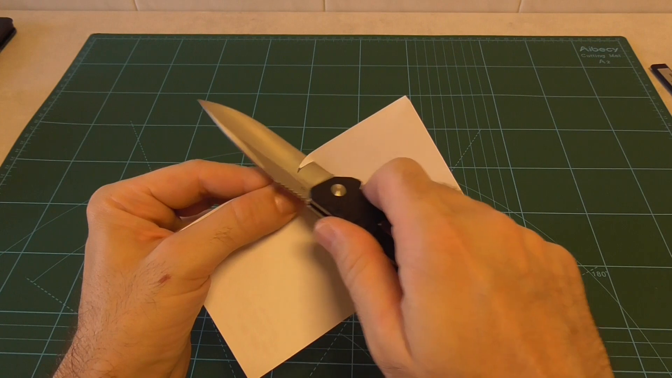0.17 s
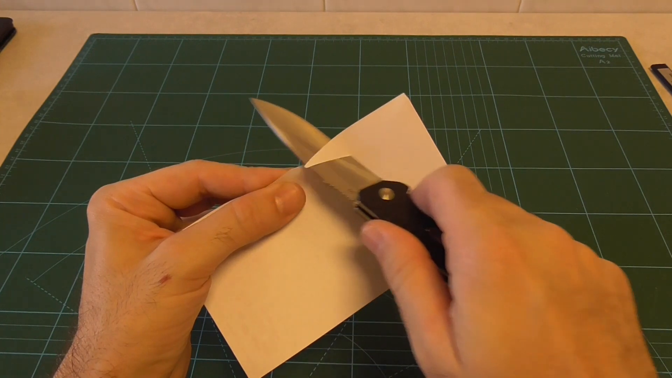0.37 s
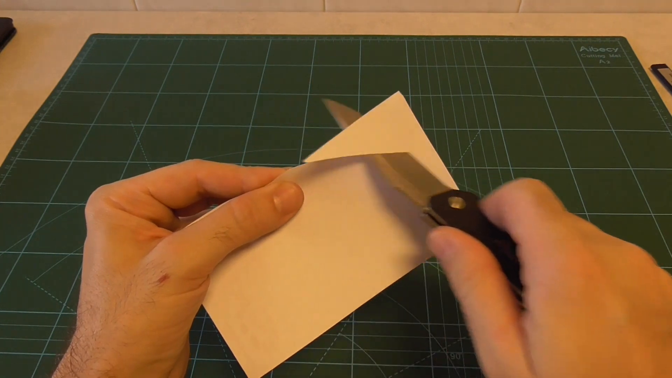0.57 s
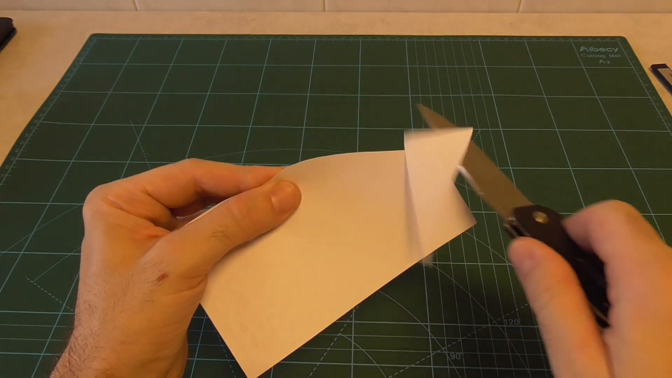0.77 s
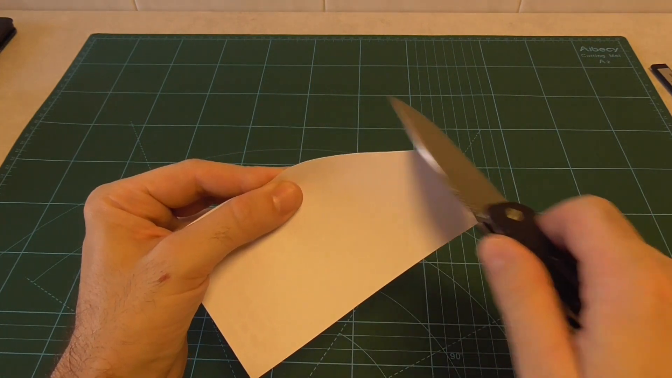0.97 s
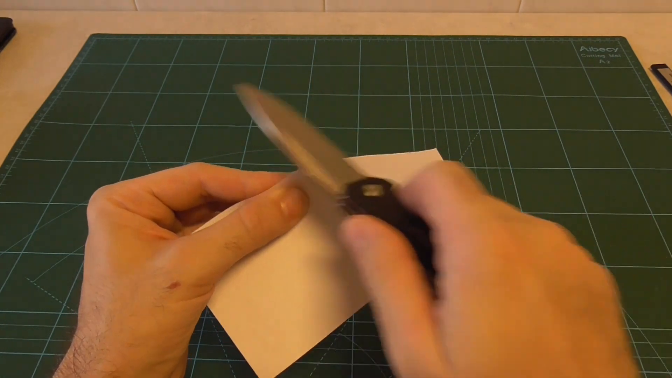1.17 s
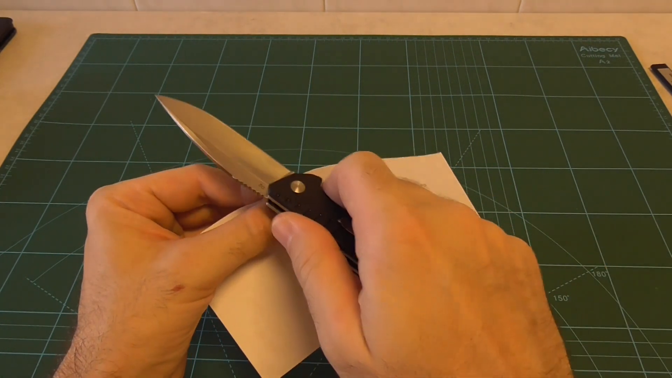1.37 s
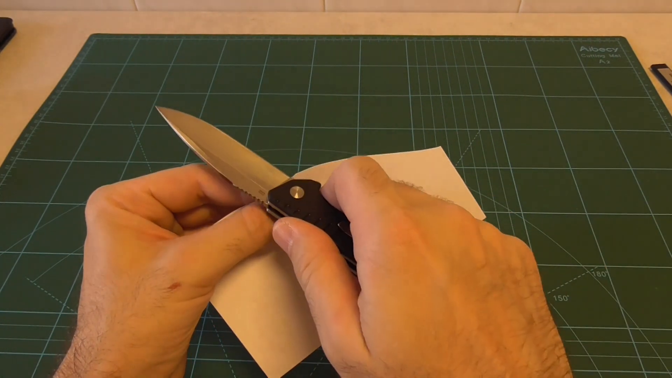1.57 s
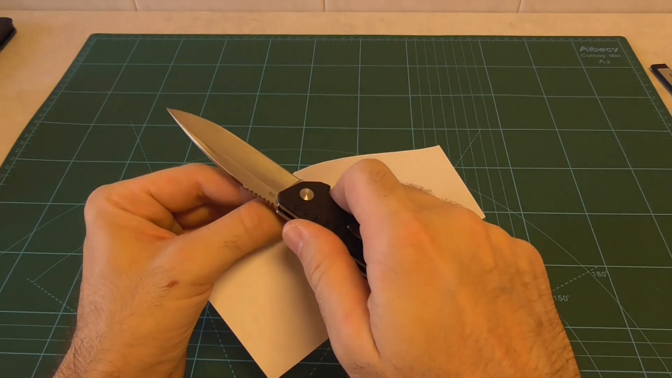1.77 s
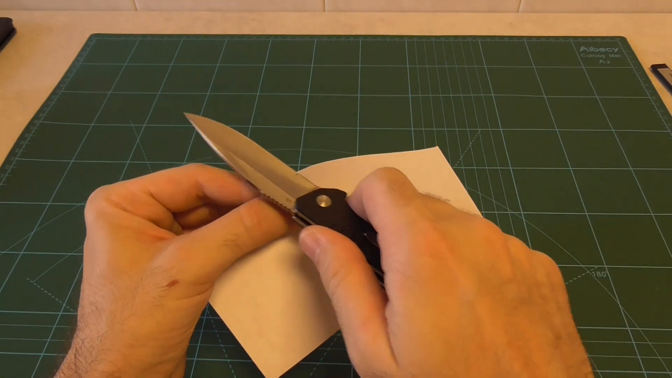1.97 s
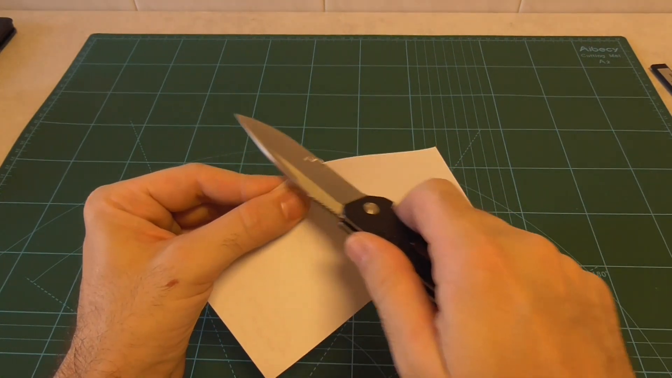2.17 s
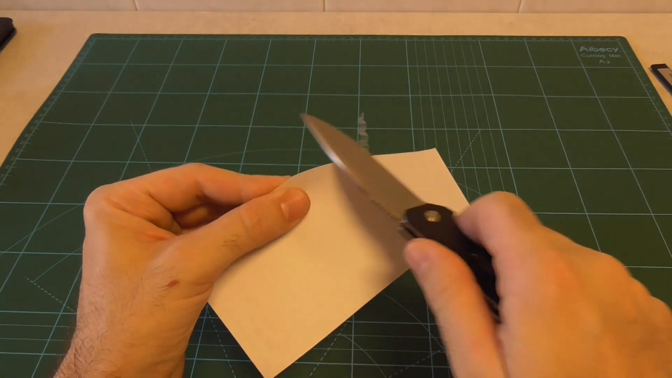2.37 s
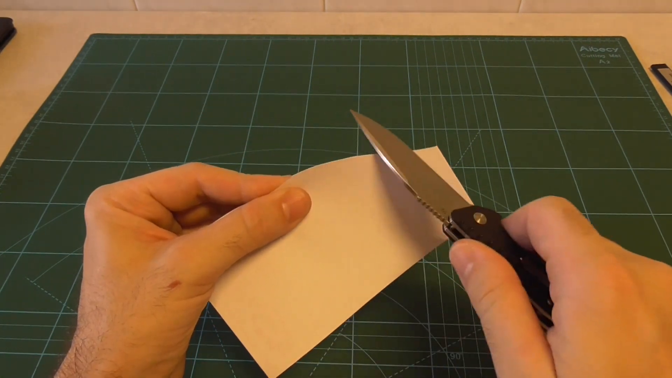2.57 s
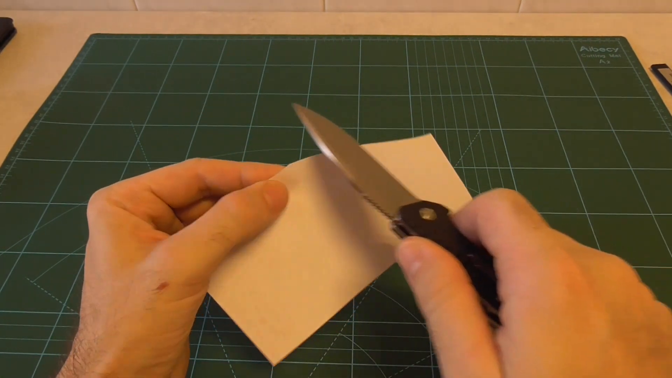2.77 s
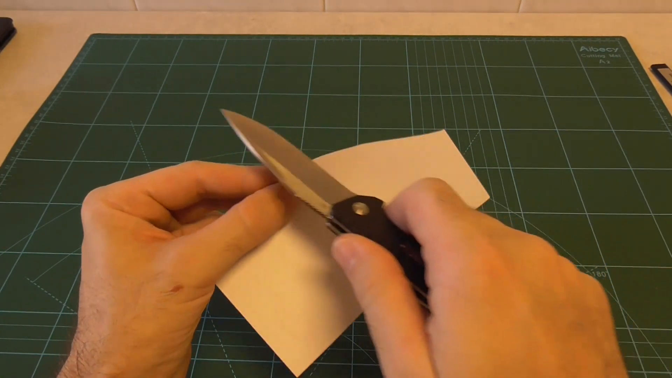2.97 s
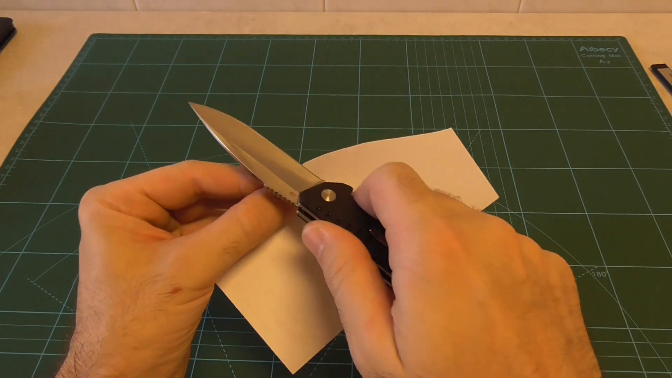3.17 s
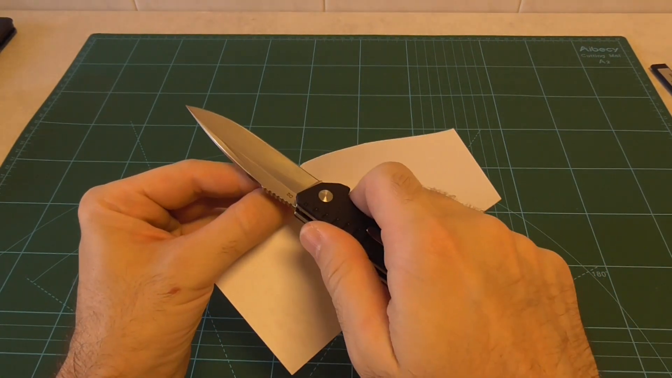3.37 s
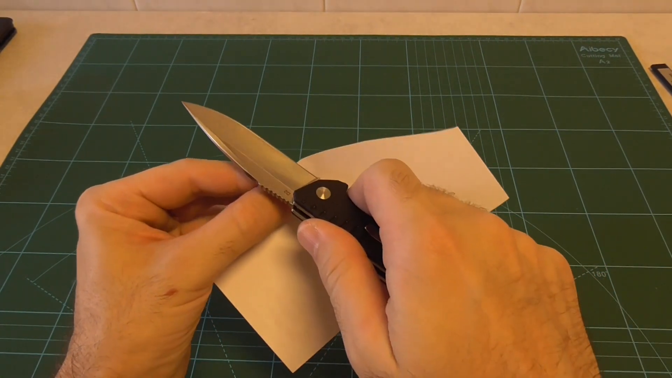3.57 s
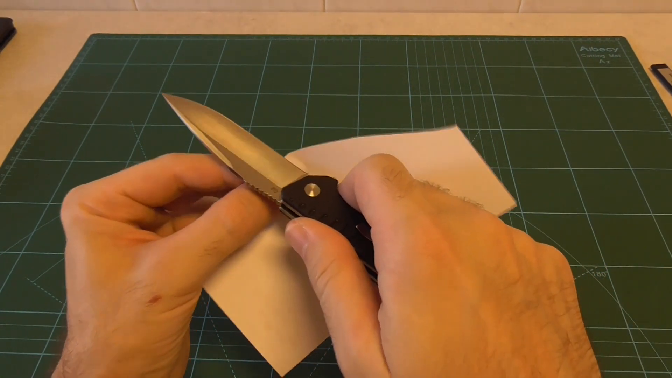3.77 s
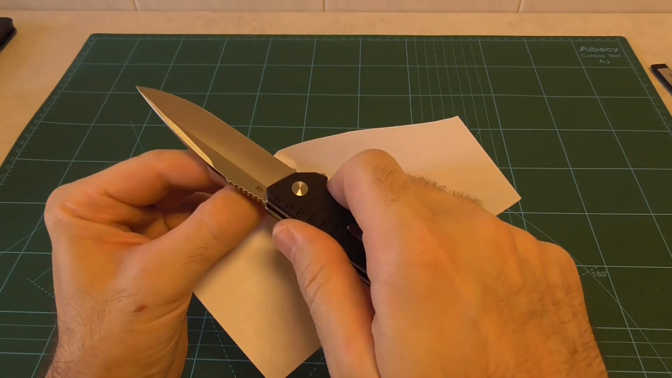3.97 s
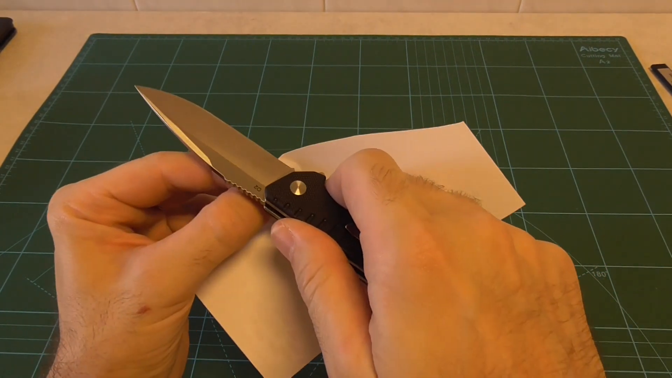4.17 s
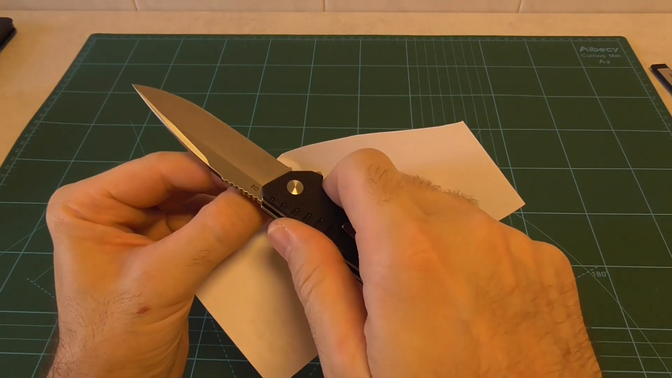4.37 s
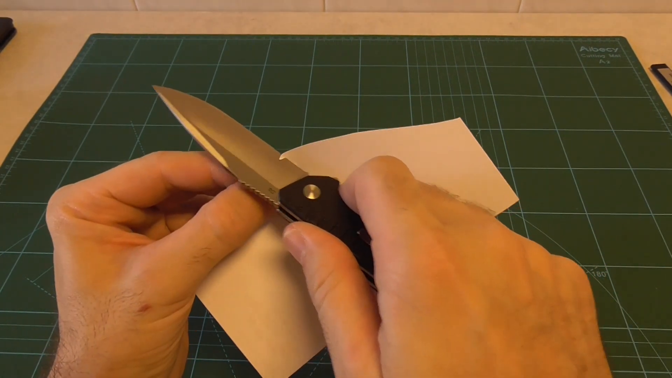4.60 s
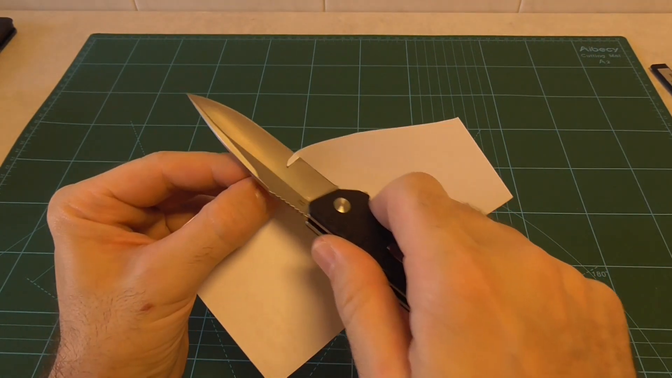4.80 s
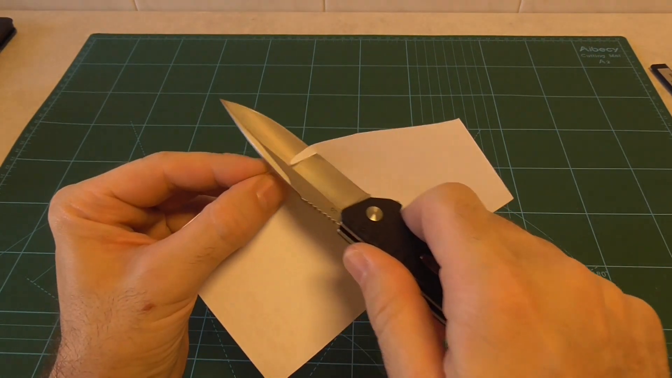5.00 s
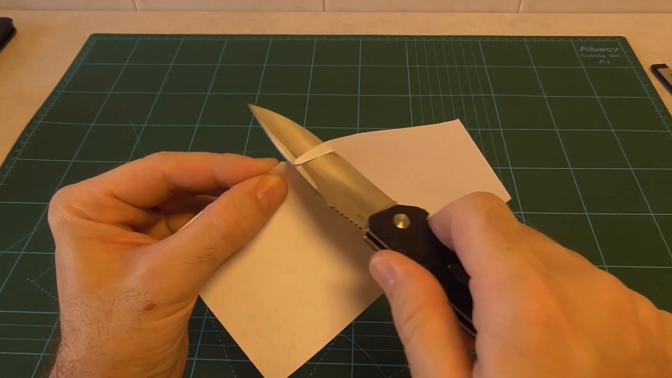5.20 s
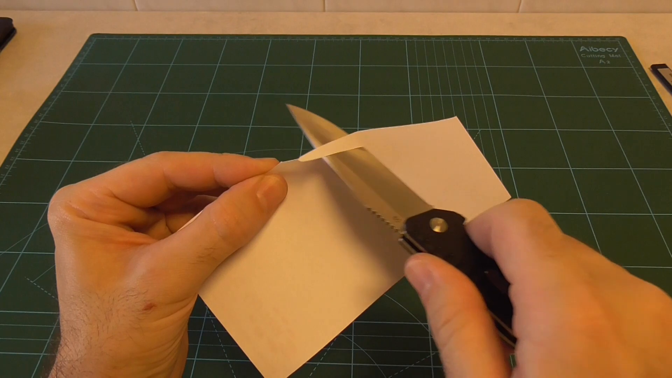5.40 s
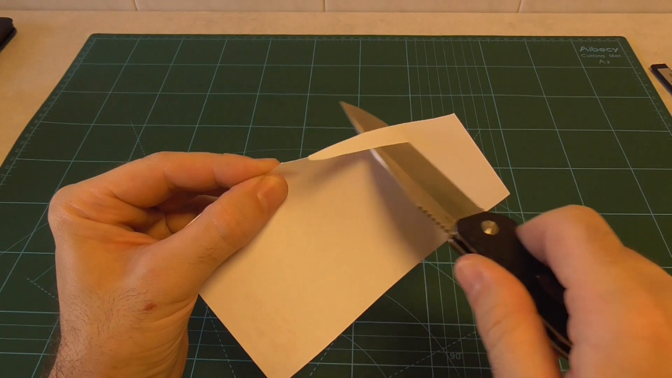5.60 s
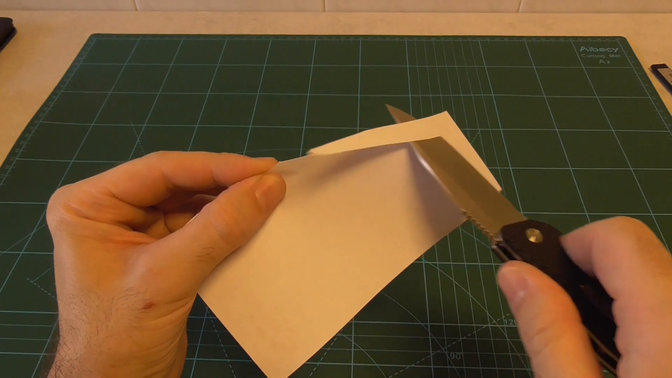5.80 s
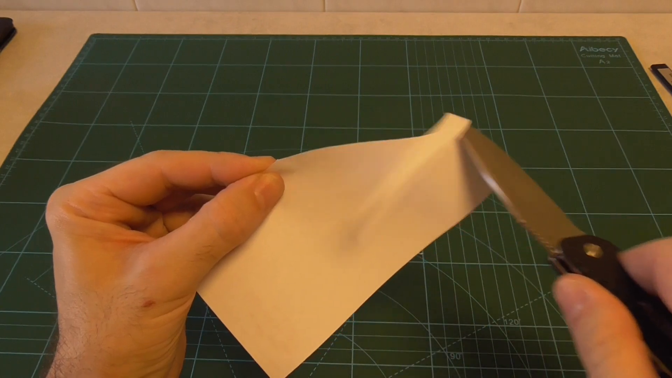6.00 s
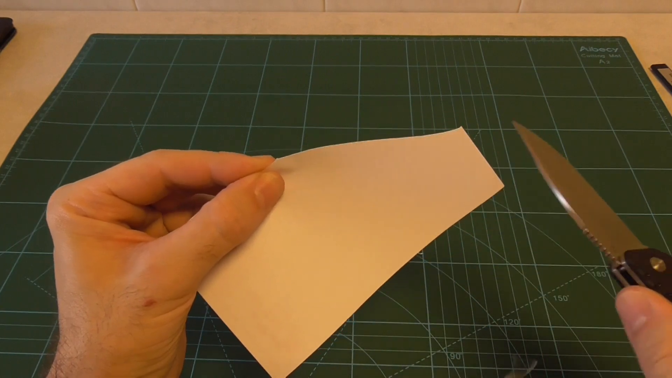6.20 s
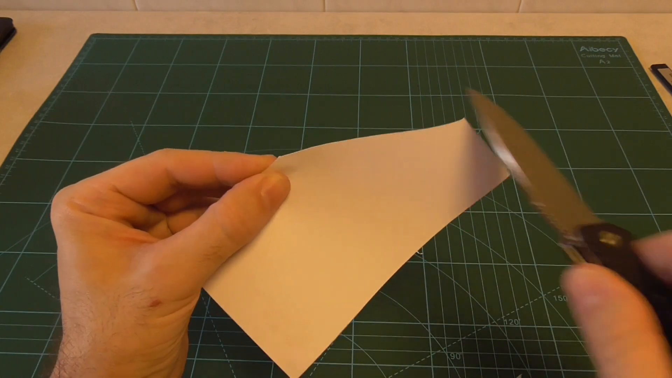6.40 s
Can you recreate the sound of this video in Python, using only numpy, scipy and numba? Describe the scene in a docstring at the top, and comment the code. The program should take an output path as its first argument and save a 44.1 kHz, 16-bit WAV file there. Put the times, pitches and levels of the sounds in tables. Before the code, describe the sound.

Close dry paper cutting: one quick rising hiss, a second shorter snappy slice, a pause with faint rustling, then a longer uneven slice.

```python
"""A desk in a small room: a folding knife makes three slicing strokes through a hand-held sheet of paper.
Each stroke is thousands of random fibre snaps, coloured as fizz and rung through the resonances of the sheet;
the strip that comes loose flaps, curls whistle downwards, and the paper beside the blade sings.
Filtered grain makes light brushes, decaying modes make soft knocks, noise bursts make the catches of the edge.
Shaped noise makes the hush of the room; a faint low tone lingers from the first stroke."""
import sys
import numpy as np
from scipy import signal
from scipy.fft import rfft, irfft, next_fast_len
from scipy.io import wavfile
from scipy.ndimage import uniform_filter1d
from numba import njit

SR = 44100
rng = np.random.default_rng(int(sys.argv[2]) if len(sys.argv) > 2 else 0)


def waveform_to_disk(signal):
    """Save audio, clipped to [-1, 1], as 16-bit WAV at the path in sys.argv[1]."""
    frames = np.transpose(np.atleast_2d(signal))
    scaled = np.clip(frames, -1, 1) * 32767
    samples = np.round(scaled).astype(np.int16)
    wavfile.write(sys.argv[1], SR, samples)


N = 284312
TIME = np.arange(N) / SR

# The edge catches on the paper and snaps free.
# Each row: moment of release in seconds, burst level in dB before filtering, low body in dB re the crack.
CATCH_EVENTS = [(1.0738, -27, -4.5), (1.9665, -35, -3), (1.984, -22, 11), (1.9963, -25.5, 15.5),
                (2.0339, -13, -16.5), (2.144, -18, -3), (2.5281, -18, 9), (3.384, -49.5, 14.5),
                (3.864, -40.5, -2), (4.838, -21.5, 15), (4.89, -19, 1), (4.945, -19, 12.5),
                (6.353, -28.5, -13)]
# Spectrum of the fibre fizz. Each row: frequency in Hz, level in dB.
FIZZ_SPECTRUM = [(1200, -42), (3000, -5.5), (5400, -2), (6200, -2.5), (7100, 3), (8200, 5.5), (11000, 5),
                 (13500, 2), (14600, -5), (16000, -20.5)]


def from_db(db):
    """Amplitude factor of a level in dB."""
    return 10 ** (np.asarray(db) / 20)


def rms_one(x):
    """Scales a whole signal to rms 1."""
    return x / np.sqrt(np.mean(x ** 2) + 1e-20)


def level(x):
    """Evens the slow level out to rms 1, over 0.1 s."""
    return x / np.sqrt(uniform_filter1d(x ** 2, SR // 10))


def gate(start_s, end_s, rise_s, fall_s):
    """Contact opens linearly and dies away exponentially after its end."""
    opening = np.clip((TIME - start_s) / rise_s, 0, 1)
    return opening * np.exp(-np.clip((TIME - end_s) / fall_s, 0, 20))


def swell(peak_s, half_s):
    """A smooth rise and fall of height 1 around a moment."""
    return np.exp(-.5 * np.minimum(((TIME - peak_s) / half_s) ** 2, 100))


def falling_swells(rows, fall_oct_per_s):
    """Gain and pitch of a run of swells; each one sinks in pitch as the cut grows."""
    gain, octaves = 1e-12, 1e-12 * np.log2(rows[0][2])
    for peak_s, half_s, hz, db in rows:
        weight = from_db(db) * swell(peak_s, half_s)
        gain = gain + weight
        octaves = octaves + weight * (np.log2(hz) - fall_oct_per_s * (TIME - peak_s))
    return gain, np.clip(2 ** (octaves / gain), 3000, 13200)


def drift(rate_hz):
    """Random wandering of rms 1 through rate_hz knots per second."""
    knots = rng.standard_normal(N // 10)
    return rms_one(np.interp(TIME * rate_hz, np.arange(len(knots)), knots))


def at_hz(points, hz):
    """Reads a curve on a logarithmic frequency axis."""
    points_hz, values = np.transpose(points)
    return np.interp(np.log(hz + 1), np.log(points_hz), values)


def colour(x, spectrum):
    """Causal (minimum-phase) filter with the given spectrum, by folding its cepstrum."""
    size = 2 * next_fast_len(N // 2 + SR // 10)
    gain = from_db(at_hz(spectrum, np.fft.rfftfreq(size, 1 / SR)))
    cepstrum = irfft(np.log(gain))
    cepstrum[1:size // 2] *= 2
    cepstrum[size // 2 + 1:] = 0
    return irfft(rfft(x, size) * np.exp(rfft(cepstrum)))[..., :N]


def resonate(x, hz, width_hz):
    """Two-pole resonance of gain 1 at its top."""
    r = np.exp(-np.pi * width_hz / SR)
    zeros = np.array([1, 0, -1]) * (1 - r * r) / 2
    poles = [1, -2 * r * np.cos(2 * np.pi * hz / SR), r * r]
    return signal.lfilter(zeros, poles, x)


@njit
def glide(x, hz, width_hz):
    """Two-pole resonance whose centre moves."""
    y, r = np.zeros(len(x)), np.exp(-np.pi * width_hz / SR)
    for i in range(2, len(x)):
        y[i] = x[i] - x[i - 2] + 2 * r * np.cos(2 * np.pi * hz[i] / SR) * y[i - 1] - r * r * y[i - 2]
    return y


def scatter(x, spread_s):
    """A dense cluster of short echoes that keeps the power."""
    t = TIME[:SR // 16]
    echoes = rng.standard_normal(len(t)) * np.exp(-t / spread_s)
    return signal.fftconvolve(x, echoes / np.linalg.norm(echoes))[:N]


def snaps(per_s, spread_db):
    """Fibres part at random moments, many faintly and a few loudly."""
    sizes = from_db(spread_db * np.minimum(rng.exponential(1, N), 4)) * rng.choice([-1, 1], N)
    return rms_one(sizes * (rng.random(N) < per_s / SR))


def sheet(force):
    """The held sheet radiates a force through its broad resonances, alternating in sign."""
    # Each row: frequency in Hz, width in Hz, level in dB.
    sheet_modes = [(615.4, 118, -1), (870, 317, 3), (1057, 436, 2), (1462, 205, 1), (1950, 202, -1.5),
                   (2320, 845, -8.5)]
    return sum((-1) ** k * from_db(db) * resonate(force, hz, width_hz)
               for k, (hz, width_hz, db) in enumerate(sheet_modes))


def hush():
    """Low rumble of the room's air with a faint even hiss."""
    # Spectrum of the air. Each row: frequency in Hz, level in dB.
    air_spectrum = [(25, -16.5), (55, -8), (110, -9), (160, -7.5), (255, -2), (430, -10), (660, -10.5),
                    (1840, -31), (6200, -35), (9500, -29.5), (16000, -34)]
    # Spread between the ports. Each row: frequency in Hz, side re mid in dB.
    air_width = [(30, -14.5), (300, -4.5), (6000, -0.5)]
    hush_db = -55.5
    mid, side = rms_one(colour(rng.standard_normal((2, N)), air_spectrum))
    side = colour(side, air_width)
    return from_db(hush_db) * np.array([mid + side, mid - side])


def brushes(edge_db):
    """Light uneven brushes, some bright from the blade's edge, some dull from shifting fingers, stir the sheet."""
    # Each row: start in seconds, length in seconds, level in dB, sheet body in dB re the fizz.
    brush_events = [(0.015, 0.049, -51, 3), (0.807, 0.057, -46, 10), (0.902, 0.051, -41.5, 1),
                    (1.024, 0.024, -45, 0.5), (1.358, 0.015, -42.5, -10), (1.413, 0.015, -47, 2),
                    (1.829, 0.04, -49, 18), (1.875, 0.03, -46, 21), (2.792, 0.084, -45, -4),
                    (2.965, 0.04, -43, -3), (3.041, 0.051, -50, 5.5), (3.383, 0.005, -47, 20),
                    (3.863, 0.025, -49, 24), (3.903, 0.029, -55.5, 10), (4.025, 0.029, -56, 14),
                    (4.094, 0.21, -57.5, 14), (6.126, 0.014, -36, 15.5)]
    grain = snaps(per_s=8100, spread_db=2.5) * from_db(2.9 * drift(130))
    fizz = colour(grain, FIZZ_SPECTRUM) + from_db(edge_db) * resonate(grain, 5020, 950)
    body = sheet(grain)
    out = np.zeros(N)
    for start_s, length_s, db, body_db in brush_events:
        contact = gate(start_s, start_s + length_s, rise_s=0.0028, fall_s=0.0085)
        out += from_db(db) * contact * rms_one(fizz + from_db(body_db) * body)
    return out


def cutting_force(clump_db, snag_db):
    """Snaps come in clumps as the edge sticks and slips, most raggedly around each catch."""
    snag = np.clip(sum(gate(s - .02, s, rise_s=.02, fall_s=.03) for s, _, _ in CATCH_EVENTS), 0, 1)
    slip = from_db((clump_db + snag_db * snag) * (drift(110) + drift(600)))
    slip /= np.sqrt(uniform_filter1d(slip ** 2, SR // 30))
    return snaps(per_s=12000, spread_db=3.0) * slip


def flexing(force, share, turns_per_s):
    """Waves bounce about in the sheet: fine resonances that come and go as it bends."""
    bend = 2 * np.pi * turns_per_s * TIME + drift(2.15)
    echoes = np.cos(bend) * scatter(force, 0.0024) + np.sin(bend) * scatter(force, 0.0045)
    return force + share * echoes


def dulling(fizz, done):
    """The growing strip shades the top of the fizz."""
    lost_share, above_hz = 0.43, 12200   # share of the top lost by the end of a cut
    top = signal.sosfiltfilt(signal.butter(2, above_hz, "high", fs=SR, output="sos"), fizz)
    return fizz - lost_share * done ** 2 * top


def curling(fizz, force):
    """Each curl gathers the fizz into a falling whistle for a moment, keeping its power."""
    # The curling strip whistles.
    # Each row: peak in seconds, half length in seconds, pitch at the peak in Hz, level in dB re the fizz.
    curls = [(0.634, 0.032, 9300, 5), (2.498, 0.017, 8560, 9.5), (5.522, 0.076, 11300, -5.5)]
    share, hz = falling_swells(curls, fall_oct_per_s=2.5)
    whistle = level(glide(glide(force, hz, 1900.0), hz, 2200.0))
    return (fizz + share * whistle) / np.sqrt(1 + share ** 2)


def taut_sheet(force, taut_db, low_hz):
    """Tension moves the sheet's energy into its sharp rings without adding any."""
    # The steady upper ring. The row: frequency in Hz, width in Hz, level in dB re the lowest ring.
    upper_ring = (1371, 43, 0.97)
    hz, width_hz, db = upper_ring
    low = rms_one(glide(force, low_hz, 92.0))
    rings = low - from_db(db) * rms_one(resonate(force, hz, width_hz))
    return level(rms_one(sheet(force)) + from_db(taut_db - 15.5) * rings)


def singing_edge(force):
    """The paper beside the blade rings in swells, each at its own pitch and sinking slightly."""
    # Each row: peak in seconds, half length in seconds, pitch at the peak in Hz, level in dB before trim.
    sings = [(0.28, 0.09, 4690, -31), (0.575, .06, 4360, -28.5), (2.2, 0.12, 4850, -31.5),
             (2.52, 0.09, 3860, -41.5), (4.84, 0.086, 4520, -37), (5.14, 0.15, 4380, -32),
             (5.7, 0.19, 4370, -34.5)]
    trim_db = 0.5
    gain, hz = falling_swells(sings, fall_oct_per_s=0.12)
    return from_db(trim_db) * gain * level(resonate(glide(force, hz, 445.0), 6640, 6800))


def stalling():
    """The cut quietens while the blade is held, just before each catch tears free."""
    stall_s, stall_db = .013, 6
    held = sum(np.clip((TIME - s + stall_s) / .003, 0, 1) * (TIME < s) for s, _, _ in CATCH_EVENTS)
    return from_db(-stall_db * np.clip(held, 0, 1))


def slicing(flutter_db):
    """One cutting force drives the fizz, the sheet, the cut edge, the flapping and the curl."""
    # The strokes. Each row: start in seconds, end in seconds, time to bite in seconds, sheet level in dB,
    # sharp rings in dB before strain and a fixed offset, lowest ring in Hz, flapping in dB before trim,
    # gain of the flapping once the strip hangs loose in dB.
    stroke_rows = [(0.042, 0.755, .1, -36, -4, 800, -54.5, 7.5),
                   (1.962, 2.609, 0.0049, -35.5, -32, 967, -47, -4.5),
                   (4.53, 6.067, .15, -36, 1.5, 639, -55.5, 15.5)]
    # Blade speed as fizz level, one curve per stroke. Each row: time in seconds, level in dB before trim.
    speed_curves = [
        [(0.06, -57), (0.11, -38.5), (0.2, -31), (0.28, -32), (0.37, -26.0), (0.54, -27.5), (0.63, -24.5),
         (0.69, -27.5), (0.755, -24.5)],
        [(1.966, -33.5), (2.025, -34.5), (2.06, -31), (2.18, -27.5), (2.35, -31), (2.48, -32.5), (2.58, -44.5),
         (2.615, -32.5)],
        [(4.54, -52.5), (4.61, -43.0), (4.72, -34.5), (4.88, -29), (5.0, -28.5), (5.13, -38.5), (5.24, -35.5),
         (5.36, -31), (5.55, -27), (5.76, -32), (5.95, -33), (6.07, -25.5)],
    ]
    # The blade drags and pulls the sheet taut.
    # Each row: peak in seconds, half length in seconds, sheet gain in dB.
    strains = [(0.387, 0.035, 3), (0.74, 0.021, 0.5), (2.43, 0.12, 2), (4.72, .13, 6.5), (5.86, 0.16, 4.5)]
    # Spectrum of the flapping strip. Each row: frequency in Hz, level in dB.
    flap_spectrum = [(60, -38), (140, -7), (265, 6), (520, -4.5), (900, -12.5)]
    fizz_trim_db, flap_trim_db = 0.7, 5.0
    bite_swell_db = 14.5   # sheet and flapping swell by this much as the blade bites in
    loose_before_end_s, loose_rise_s = .27, 0.14
    cruise_db = -32   # fizz at an ordinary blade speed, before trim
    sheet_follows = 0.25   # share of the speed's swing in dB that reaches the sheet
    ring_db_per_strain_db = 2.65

    cuts = np.transpose(stroke_rows)
    stroke = np.maximum(np.searchsorted(cuts[0], TIME) - 1, 0)
    start_s, end_s, bite_s, sheet_db, rings_db, low_hz, flap_db, loose_db = cuts[:, stroke]
    speed_db = np.choose(stroke, [np.interp(TIME, *np.transpose(rows)) for rows in speed_curves])
    strain_db = sum(db * swell(peak_s, half_s) for peak_s, half_s, db in strains)
    bite_db = -bite_swell_db * np.clip(1 - (TIME - start_s) / bite_s, 0, 1)
    done = np.clip((TIME - start_s) / (end_s - start_s), 0, 1)
    loose = np.clip((TIME - end_s + loose_before_end_s) / loose_rise_s, 0, 1)

    force = cutting_force(clump_db=0.36, snag_db=0.5)
    bent = flexing(force, share=.7, turns_per_s=.8)

    fizz = dulling(rms_one(colour(bent, FIZZ_SPECTRUM)), done)
    fizz = from_db(fizz_trim_db + speed_db) * curling(fizz, bent)

    body = taut_sheet(bent, rings_db + ring_db_per_strain_db * strain_db, low_hz)
    body_db = sheet_db + strain_db + sheet_follows * (speed_db - cruise_db)
    body *= from_db(body_db + flutter_db * drift(60))

    flap = from_db(flap_db + loose_db * loose + flap_trim_db) * rms_one(colour(force, flap_spectrum))

    contact = gate(start_s, end_s, rise_s=0.0043, fall_s=0.0042) * stalling()
    return contact * (fizz + singing_edge(force) + from_db(bite_db) * (body + flap))


def low_ring():
    """One faint low tone enters during the first stroke, lingers and fades."""
    # The row: start in seconds, frequency in Hz, peak in dB, time to fall by 60 dB in seconds.
    low_tone = (0.5, 140.5, -54, 8)
    start_s, hz, db, t60_s = low_tone
    envelope = gate(start_s, start_s, rise_s=0.011, fall_s=t60_s / np.log(1000))
    return from_db(db) * envelope * np.sin(2 * np.pi * hz * TIME)


def strike(times_s, levels_db, modes):
    """Each blow sets every mode ringing, with strengths that vary by about a decibel."""
    out = np.zeros(N)
    for k, (hz, mode_db, t60_s) in enumerate(modes):
        clicks = np.zeros(N)
        blow_db = levels_db + mode_db + rng.standard_normal(len(times_s))
        clicks[(times_s * SR).astype(int)] = from_db(blow_db)
        r, w = from_db(-60 / (t60_s * SR)), 2 * np.pi * hz / SR
        ringing = signal.lfilter([0, np.sin(w)], [1, -2 * r * np.cos(w), r * r], clicks + 1e-18)
        out += (-1) ** k * ringing
    return out


def knocks(ring_db, thud_db):
    """Dull taps of paper, blade and fingers, some with a thud of the hand or mat beneath."""
    # Each row: moment in seconds, level in dB before trim, depth in dB (thud re ring, before trim).
    knock_events = [(0.75, -16, -21), (0.844, -16, -19.5), (1.362, -33.5, -7), (1.513, -45, -4),
                    (2.949, -41.5, -5), (3.384, -36.5, -24), (3.864, -33.5, -2)]
    # Modes of the tap. Each row: frequency in Hz, level in dB, time to fall by 60 dB in seconds.
    tap_modes = [(648, 3.5, 0.032), (786, -0.5, 0.055), (1027, 0, 0.024), (1287, -2, 0.035),
                 (1420, -10, 0.037), (2050, -7.5, 0.0069)]
    # Modes of the thud. Each row: frequency in Hz, level in dB, time to fall by 60 dB in seconds.
    low_modes = [(172, -7, 0.05), (254, 9, 0.014)]
    times_s, db, depth_db = np.transpose(knock_events)
    ring = strike(times_s, db + ring_db, tap_modes)
    return ring + strike(times_s, db + depth_db + thud_db, low_modes)


def catches(body_db):
    """A bundle of fibres gives way in a burst of a few milliseconds."""
    crack, body = np.zeros(N), np.zeros(N)
    for s, db, low_db in CATCH_EVENTS:
        burst = from_db(db) * gate(s, s + 0.0003, rise_s=.0001, fall_s=.0018)
        crack += burst
        body += burst * from_db(low_db)
    force = rng.choice([-1., 1.], N)
    return colour(force * crack, FIZZ_SPECTRUM) + from_db(body_db) * sheet(force * body)


def ports(x, spread_s):
    """Scatter off hands and desk reaches the two microphone ports differently."""
    # Each row: frequency in Hz, side re mid in dB.
    port_width = [(100, -22), (1000, -81), (5000, -14), (9000, -8)]
    side = colour(scatter(x, spread_s), port_width)
    return np.array([x + side, x - side])


def room(x, apart):
    """A diffuse tail of decaying noise in octave bands, the treble dying first."""
    # Each row: frequency in Hz, time to fall by 60 dB in seconds.
    room_decay = [(1000, 0.55), (4000, 0.68), (16000, 0.068)]
    t, tail = TIME[:SR // 2], 0
    edges_hz = np.geomspace(120, 16000, 8)
    for low_hz, high_hz in zip(edges_hz, edges_hz[1:]):
        band_pass = signal.butter(2, [low_hz, high_hz], "band", fs=SR, output="sos")
        band = signal.sosfilt(band_pass, rng.standard_normal((2, len(t))))
        t60_s = at_hz(room_decay, np.sqrt(low_hz * high_hz))
        tail = tail + band * np.exp(-np.log(1000) * t / t60_s)
    tail *= np.clip(t / 0.0076, 0, 1)
    mid, side = signal.fftconvolve(x[None], tail / np.linalg.norm(tail[0]), axes=1)[:, :N]
    return np.array([mid + apart * side, mid - apart * side])


def scene():
    """Paper and blade close to the microphone, in the room and its hush."""
    paper = brushes(edge_db=1.0) + slicing(flutter_db=2.0)
    paper = paper + knocks(ring_db=-7.0, thud_db=1.0) + catches(body_db=2.0)
    # a small sheet radiates hardly any bass
    paper = signal.sosfilt(signal.butter(3, 130, "high", fs=SR, output="sos"), paper)
    return hush() + ports(paper, spread_s=.01) + from_db(-13) * room(paper, apart=0.48) + low_ring()


def record(dry):
    """The top is cut steeply."""
    cutoff_hz = 16000
    return signal.sosfilt(signal.ellip(10, .1, 80, cutoff_hz, fs=SR, output="sos"), dry)


dry = scene()
out = record(dry)
waveform_to_disk(out)
```